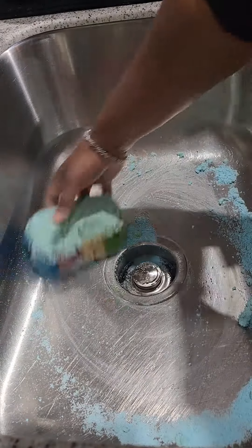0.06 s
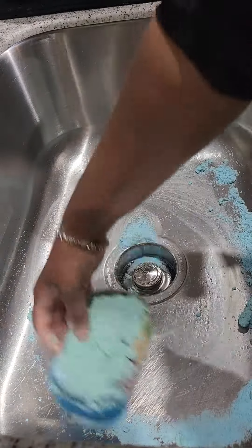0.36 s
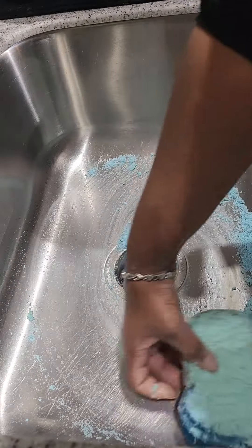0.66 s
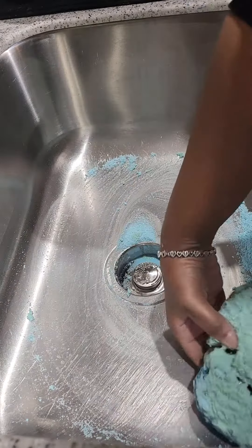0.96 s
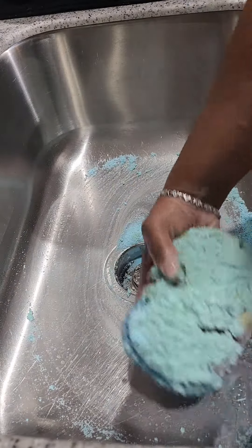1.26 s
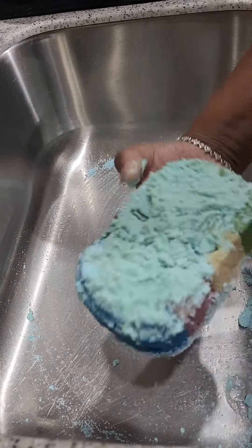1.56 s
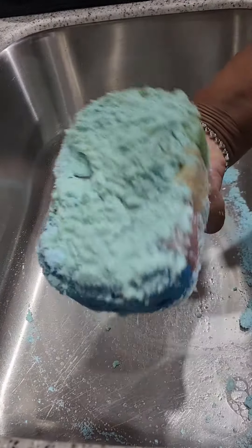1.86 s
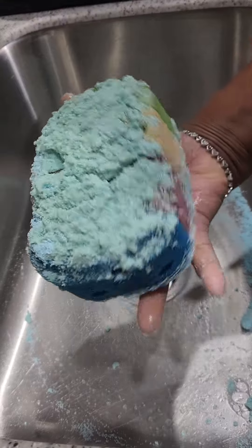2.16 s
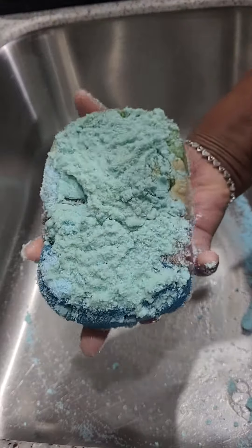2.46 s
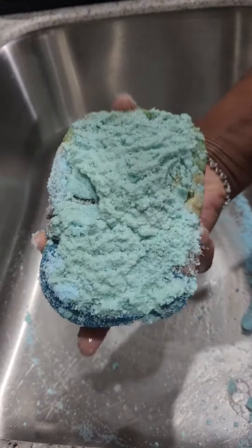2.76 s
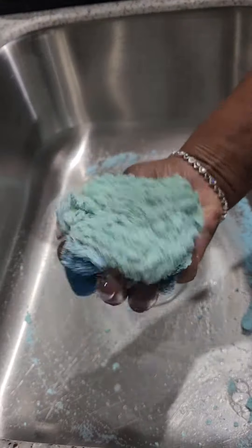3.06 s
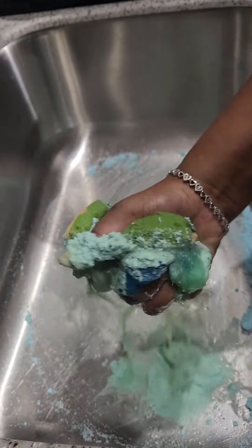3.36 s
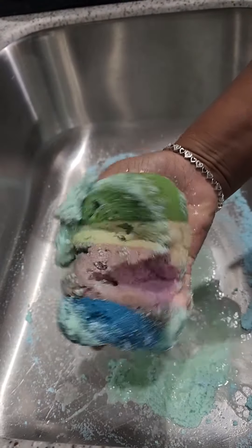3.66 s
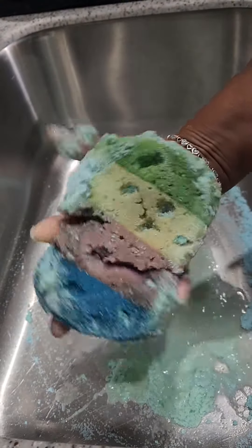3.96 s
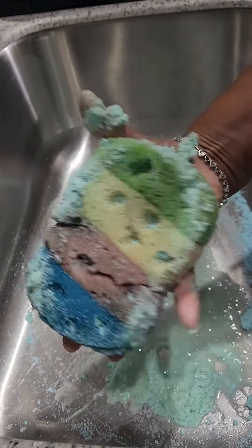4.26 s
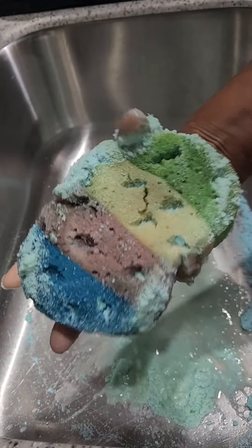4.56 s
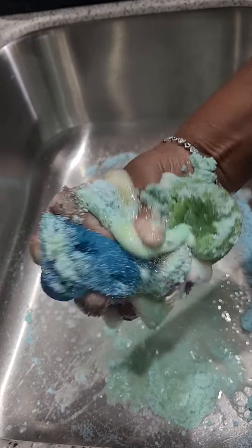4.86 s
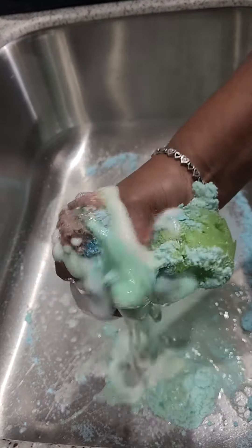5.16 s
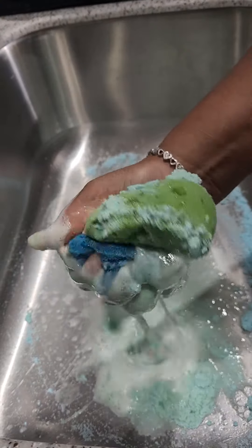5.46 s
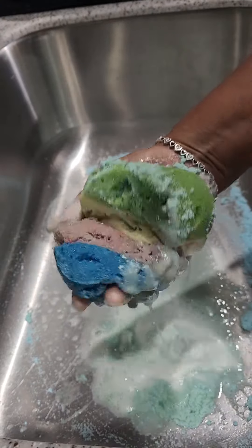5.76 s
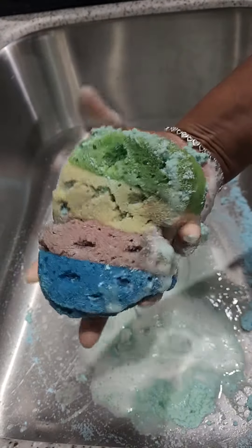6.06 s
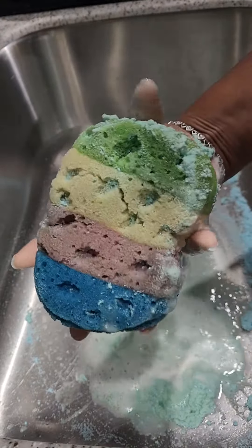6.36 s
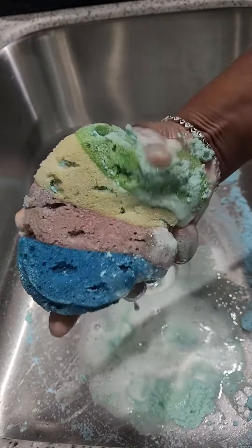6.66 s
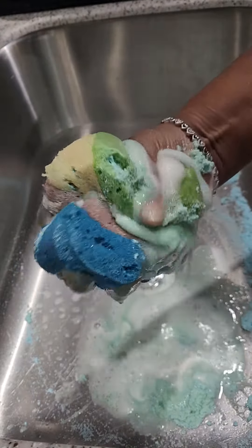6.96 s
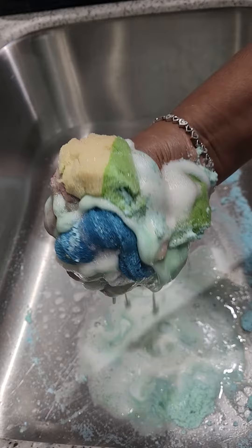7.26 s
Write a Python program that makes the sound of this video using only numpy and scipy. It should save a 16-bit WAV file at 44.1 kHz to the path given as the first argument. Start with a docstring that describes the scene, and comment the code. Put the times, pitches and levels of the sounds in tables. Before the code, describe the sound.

A sponge caked with cleanser scrapes round a stainless steel sink with a gritty hiss and low drumming. After a quieter stretch and one sharp tap, it is squeezed three times. Foam fizzes and crackles, lumps of paste splat on the basin, bubbles pop and air gurgles out. A couple of softer taps come with the last squeeze. The sound is close, in a kitchen with faint hum and hiss.

```python
"""Soapy sponge in a steel sink

A sponge caked with cleanser paste is wiped round the sink, lifted and squeezed three times.
Foam fizzes and crackles in its pores, paste and suds drop on the drumming basin, air gurgles out.
A few hard taps sound nearby; mains hum, room rumble and microphone hiss lie underneath."""
import sys
import numpy as np
from scipy import signal
from scipy.fft import rfft, irfft
from scipy.io import wavfile

SR = 44100
rng = np.random.default_rng(int(sys.argv[2]) if len(sys.argv) > 2 else 0)


def wav_out(sig):
    """Save sig, one row per channel (or a flat mono array), as 16-bit PCM at SR to the path in sys.argv[1]."""
    wavfile.write(sys.argv[1], SR, np.round(np.clip(np.atleast_2d(sig).T, -1, 1) * 32767).astype(np.int16))


N = 326340
TIME = np.arange(N) / SR
TOP_HZ = 15900


def undb(db):
    """Decibels to gain."""
    return 10 ** (np.asarray(db) / 20)


def colour(x, spectrum, size=8192):
    """Minimum-phase filter of unit power gain through (Hz, dB) points."""
    hz, db = np.transpose(spectrum)
    bins_hz = np.arange(size // 2 + 1) * SR / size
    gain = undb(np.interp(np.log(bins_hz + 1), np.log(hz), db))
    cepstrum = irfft(np.log(gain / np.sqrt(np.mean(gain ** 2))))
    cepstrum[1:size // 2] *= 2
    cepstrum[size // 2 + 1:] = 0
    impulse = irfft(np.exp(rfft(cepstrum)))
    return signal.fftconvolve(np.atleast_2d(x), impulse[None], axes=1)[:, :x.shape[-1]]


def tilted(rows, db_per_octave):
    """Tilt a spectrum or a set of modes above 1500 Hz."""
    return [(hz, db + db_per_octave * np.log2(max(hz / 1500, 1)), *rest) for hz, db, *rest in rows]


def butter(x, order, hz, kind):
    """Butterworth filter."""
    return signal.sosfilt(signal.butter(order, hz, kind, fs=SR, output="sos"), x)


def unit(x, band):
    """Scale the mono mix to rms 1 in a named band."""
    edges_hz = {"bass": (40, 200), "body": (250, 650), "gulp": (600, 1300),
                "wet": (1200, 2800), "fine": (4000, 14000)}[band]
    return x / butter(np.atleast_2d(x).mean(0), 3, edges_hz, "band").std()


def pan(x, left_db):
    """Stereo with the left channel left_db above the right."""
    return x * undb(np.array([[left_db], [-left_db]]) / 2)


def wander(rate_hz):
    """Smooth random curve with a spread near 1."""
    return 1.2 * np.interp(TIME * rate_hz, np.arange(4000), rng.standard_normal(4000))


def add(track, start_s, sound):
    """Mix a short sound into a track."""
    start = min(max(int(start_s * SR), 0), N)
    part = sound[..., :N - start]
    track[..., start:start + part.shape[-1]] += part


def envelopes(moves, swell_db=21.5):
    """One gain curve per level column: each move rises, holds and falls; overlaps add in power."""
    t = TIME[::64]
    power = 0
    for start_s, rise_s, hold_s, fall_s, *levels_db in moves:
        rising = np.maximum(1 - (t - start_s) / rise_s, 0)
        falling = np.maximum(t - start_s - rise_s - hold_s, 0) / fall_s
        drop_db = swell_db * np.minimum(rising ** 2 + falling ** 2, 10)
        power = power + undb(np.subtract.outer(levels_db, swell_db * np.minimum(rising ** 2 + falling, 10))) ** 2
    return np.array([np.interp(TIME, t, gain) for gain in np.sqrt(power)])


def ring(modes, lag_turns=0):
    """Struck modes dying away; a phase lag from each to the next makes the ring swell in."""
    t = TIME[:SR // 2]
    return sum(undb(db - 60 * t / t60_s) * np.sin(2 * np.pi * (hz * t - lag_turns * k))
               for k, (hz, db, t60_s) in enumerate(modes))


def burst(t60_s):
    """A dying puff of stereo noise."""
    return rng.standard_normal((2, SR // 4)) * undb(-60 * TIME[:SR // 4] / t60_s)


def clicks(per_s, spread_db):
    """Random impulses, each with its own lag between the channels."""
    when, side, strength = rng.random((int(per_s * N / SR), 3)).T
    at = (when * (N - 40)).astype(int) + 20
    lag = (side * 24 - 14).astype(int)
    size = undb(spread_db * np.minimum(-np.log(strength), 4.5)) * (-1) ** np.arange(len(at))
    return np.array([np.bincount(at, size, N), np.bincount(at + lag, size, N)])


def bubble(hz, cycles, glide):
    """An air bubble rings and rises in pitch as it reaches the surface."""
    age = TIME[:int(SR * cycles / hz) + 2] * hz / cycles
    return undb(-50 * age) * np.sin(2 * np.pi * cycles * (age + glide * age ** 2 / 2))


def bubbles(per_s, centre_hz, octaves, spread_db, cycles, glide):
    """A steady swarm of bubbles of scattered size, pitch and place."""
    out = np.zeros((2, N))
    count = int(per_s * N / SR)
    starts_s = rng.random(count) * N / SR
    for start_s, (pitch, size, side) in zip(starts_s, rng.standard_normal((count, 3))):
        hz = np.clip(centre_hz * 2 ** (octaves * pitch), 250, TOP_HZ)
        sound = undb(spread_db * min(size, 2)) * bubble(hz, cycles, glide)
        add(out[0], start_s, undb(1.5 * side) * sound)
        add(out[1], start_s + 0.00018 * side, undb(-1.5 * side) * sound)
    return out


# Room rumble and microphone hiss spectra. Each row: frequency in Hz, density in dB.
RUMBLE_SPECTRUM = [(20, -9.5), (40, 2.5), (58, 9), (80, 6), (105, -1.5), (145, 5.5), (190, -10.5),
                   (245, -28), (305, -13.5), (370, -26), (520, -44), (720, -24.5), (1100, -32), (4000, -55)]
HISS_SPECTRUM = [(300, -7), (1400, -14), (2000, 3.5), (2650, 2), (3300, -8), (3900, -9), (4700, -4.5),
                 (5700, -2.5), (6700, -13), (7700, -4.5), (9200, -20.5), (13000, -18.5), (16000, -21)]

def background(hum_hz=60, hum_db=-60.5, rumble_db=-62.5, hiss_db=-72, drop_s=3.3, drop_db=-3):
    """Mains hum, room rumble and microphone hiss, mostly left, that sinks a little midway."""
    hum = np.sqrt(2) * np.sin(2 * np.pi * hum_hz * TIME + 0.051 * wander(26))
    hum *= undb(hum_db + 0.61 * wander(22))
    noise = rng.standard_normal(N) + 0.3 * rng.standard_normal((2, N))
    rumble = undb(rumble_db) * unit(colour(noise, RUMBLE_SPECTRUM), "bass")
    hiss = unit(pan(colour(rng.standard_normal((2, N)), HISS_SPECTRUM), 18.8), "fine")
    hiss *= undb(hiss_db + drop_db * np.clip(TIME - drop_s + 0.5, 0, 1))
    return pan(hum + rumble, 1.3) + hiss


def kitchen_echo(x):
    """Short reflections off the kitchen walls."""
    walls = burst(t60_s=0.12)
    return signal.fftconvolve(x, walls / np.linalg.norm(walls[0]), axes=1)[:, :N]


# Air and wall resonances of the sink. Each row: frequency in Hz, level in dB, T60 in seconds.
HOLLOW_MODES = [(418.8, 12.5, 0.13), (706, -3.5, 0.15), (745, -4, 0.15), (816, -2.5, 0.15),
                (860, -15, 0.11), (972, 4.5, 0.081), (1500, -15, 0.1), (1624, -8.5, 0.18),
                (2130, -16, 0.18)]

def sink_hollow(x):
    """The hollow of the sink rings along with sounds made in it."""
    return signal.fftconvolve(x.mean(0), ring(HOLLOW_MODES))[:N]


# Steel floor modes. Each row: frequency in Hz, level in dB, T60 in seconds.
BASIN_MODES = [(75.5, -1, 0.15), (128.3, -12.5, 1), (145, -11.5, 0.58), (190, -8, 0.14),
               (232.3, -15.5, 0.28), (270.7, -10, 0.32), (297.8, 1, 0.26), (318.8, -1, 0.17),
               (375.6, -8, 0.23), (427.5, -9, 0.26), (457.7, -8, .25), (485.7, -9, 0.26),
               (504.2, -10, 0.24), (539, -10.5, 0.14), (600, -23, 0.14), (715, -21, 0.22), (766, -21, 0.16),
               (920, -19, 0.14)]

def basin(force):
    """The steel floor answers a force with its low modes and radiates little below them."""
    return butter(signal.fftconvolve(force, ring(BASIN_MODES, lag_turns=0.4316))[:N], 2, 60, "high")


# Hard taps. Each row: start in seconds, level in dB, tilt in dB per octave.
TAP_HITS = [(2.134, -22, 0.3), (6.4784, -47, -6), (6.5795, -36.5, -10)]
# Their crack. Each row: frequency in Hz, density in dB.
CRACK_SPECTRUM = [(200, -25), (720, -23), (980, -5), (1950, 1), (2650, -10), (4000, -22), (4800, -9),
                  (6300, -16), (8000, -23), (10000, -28), (15000, -37)]
# Their ring. Each row: frequency in Hz, level in dB, T60 in seconds.
TAP_MODES = [(1027, -8, 0.061), (1250, -27, 0.06), (1433, 4, 0.087), (1840, -8, .07), (1990, 0, 0.08),
             (3050, -5, 0.045), (4650, -9, 0.086), (4960, -5, 0.047), (5330, -8, 0.13), (5750, -11, .08),
             (7140, -11, 0.14)]

def taps(crack_db=17.5, ring_db=-19, scatter_db=-6.5, left_lag_s=0.00015):
    """Hard contacts: a sharp crack, a short ring and scatter from the sink walls."""
    out = np.zeros((2, N))
    for start_s, db, tilt in TAP_HITS:
        contact = undb(scatter_db) * burst(t60_s=0.032)
        contact[:, 0] += undb(crack_db)
        tap = colour(contact, tilted(CRACK_SPECTRUM, tilt))
        tap += undb(ring_db) * ring(tilted(TAP_MODES, tilt), lag_turns=0.297)[:SR // 4]
        add(out[0], start_s + left_lag_s, undb(db) * tap[0])
        add(out[1], start_s, undb(db) * tap[1])
    return pan(out, 4)


# Sponge shifting in the hand. Each row: start, rise, hold, fall in seconds, level in dB, pitch in Hz.
SQUEAK_MOVES = [(1.202, 0.11, 0.036, 0.15, -79, 687), (1.716, 0.063, 0.29, 0.24, -87.5, 667),
                (2.714, 0.054, 0.26, 0.34, -75, 790)]

def squeaks(skirt_ratio=1.32, skirt_db=-22):
    """Wet foam slips against the skin in tiny jerks that ring one narrow band."""
    out = np.zeros((1, N))
    for *move, hz in SQUEAK_MOVES:
        band = [(hz / 2, -60), (hz / skirt_ratio, skirt_db), (hz, 0),
                (hz * skirt_ratio, skirt_db), (hz * 2, -60)]
        slips = colour(clicks(per_s=900, spread_db=1.5)[0], band)
        out += slips / slips.std() * envelopes([move])
    return pan(out, 8.9)


# Falling lumps. Each row: start in seconds, thud in dB, splat in dB, splat tilt in dB per octave.
LUMPS = [(0.061, -45.5, -62, -13), (0.271, -57, -62, -19), (.552, -52, -58, -11), (.925, -63, -54.5, -14),
         (1.426, -59.5, -70, -10), (1.72, -64.5, -78, -4), (2.137, -52.5, -72, -10),
         (2.337, -60.5, -58, -3.5), (2.613, -62, -59, 5), (3.242, -70, -46, -3.5), (3.380, -36, -33, 2),
         (3.392, -41.5, -30.5, 0.5), (3.41, -36, -34.5, 6), (3.4416, -35, -30, -2.5), (3.447, -30, -38, -1),
         (3.461, -32, -33, 2), (3.479, -43, -32.5, -3), (3.505, -45, -33, -0.5), (3.689, -48, -54, 5),
         (4.045, -42, -41, 3.5), (4.23, -42, -45, 1.5), (4.328, -54.5, -55, -0.5), (4.886, -52, -47, -18),
         (5.162, -47, -48, 5), (5.352, -49, -45, 2), (5.419, -59.5, -50, -2), (5.681, -58, -54, -8),
         (6.02, -62, -51, -8.5), (6.315, -53.5, -64, -4), (6.581, -53.5, -47, -3)]
# Wet splat. Each row: frequency in Hz, density in dB.
SPLAT_SPECTRUM = [(200, -21), (700, 8.5), (1200, 3.5), (1900, 4), (2700, 3), (3400, 8.5), (7500, 9),
                  (9000, 3), (11000, 3.5), (14500, 1), (16000, 6)]

def plops(push_s=0.00084, slump_db=-26):
    """Soft lumps splat, push the steel and slump on it."""
    force, splats = np.zeros(N), np.zeros((2, N))
    push = np.exp(-TIME[:SR // 4] / push_s) / (push_s * SR)
    for start_s, thud_db, splat_db, tilt in LUMPS:
        slump = undb(slump_db) * burst(t60_s=0.12)[0] / np.sqrt(push_s * SR)
        splat = colour(burst(t60_s=0.063), tilted(SPLAT_SPECTRUM, tilt))
        add(force, start_s, undb(thud_db) * (push + slump))
        add(splats, start_s, undb(splat_db) * splat)
    return pan(basin(force), 1.8) + pan(splats, 4.2)


def air_pocket(start_s=6.712, hz=181, swell_s=0.022, tone_db=-33, splutter_db=-44, splutter_s=0.03):
    """Air blurts through the paste: a low note with a wet splutter on each flap."""
    out, t = np.zeros((2, N)), TIME[:SR // 3]
    flap = np.sin(2 * np.pi * np.cumsum(hz * (1 + 0.024 * wander(48)[:len(t)])) / SR)
    swell = (t / swell_s * np.exp(1 - t / swell_s)) ** 0.99
    spray = colour(rng.standard_normal((2, len(t))) * (1 + 0.23 * flap),
                   [(600, -0.5), (850, 2.5), (1100, -5), (1500, 3),
                    (2500, -4.5), (3500, -24), (9000, -39)])
    throat = colour(rng.standard_normal(len(t)),
                    [(130, -28), (200, 4.5), (290, 7.5), (400, -13), (560, 3.5), (750, -22), (2000, -49)])
    splutter = (throat + spray) * t / splutter_s * np.exp(1 - t / splutter_s)
    add(out, start_s, undb(tone_db) * swell * flap + undb(splutter_db) * splutter)
    return pan(out, 1.7)


# Escaping air. Each row: start, rise, hold, fall in seconds, level in dB.
AIR_ESCAPES = [(4.62, 0.24, .15, .2, -56.5), (4.99, 0.049, 0.041, 0.14, -39.5),
               (5.45, 0.12, 0.54, 0.37, -68), (6.29, 0.047, 0.015, 0.15, -59),
               (6.46, 0.02, .03, 0.13, -54.5)]

def gurgle():
    """Air forced between the fingers makes a cluster of mid-sized bubbles, damped by the suds."""
    swarm = bubbles(per_s=600, centre_hz=1000, octaves=0.42, spread_db=2.5, cycles=14, glide=0.08)
    swarm = unit(butter(swarm, 2, 640, "high"), "gulp")
    return pan(swarm * envelopes(AIR_ESCAPES) * undb(-6.5), 4.9)


# One light pass over the steel with harder pushes on top.
# Each row: start, rise, hold, fall in seconds, then hiss, scrape, drumming in dB.
WIPE_STROKES = [(0.0, 0.0033, 1.046, 0.057, -63, -76.5, -73), (0.0, 0.088, 0.035, 0.24, -52.5, -69, -83),
                (0.435, 0.074, 0.048, 0.33, -54, -77, -73), (0.485, 0.063, 0.047, 0.12, -71, -68, -51),
                (0.61, 0.04, 0.019, 0.28, -62, -68, -53), (0.88, 0.048, 0.02, 0.063, -82, -64, -59),
                (0.975, 0.042, 0.023, 0.06, -62.5, -65.5, -89)]
# Grit hiss, scrape and drag force spectra. Each row: frequency in Hz, density in dB.
GRIT_SPECTRUM = [(600, -26), (1300, -24), (2200, -18), (3200, -9.5), (5300, -3.5), (6500, -3), (7500, -1),
                 (8800, -5.5), (10300, -4), (11200, -10.5), (13000, -6.5), (16000, -12.5)]
SCRAPE_SPECTRUM = [(400, -11), (900, 4), (1900, 3), (3000, -12), (8000, -45)]
DRAG_SPECTRUM = [(80, -27), (150, -11.5), (280, -11.5), (400, -8.5), (520, 5), (650, 7), (1000, -15)]

def wipe(grain_db=0.7, judder_db=4.5):
    """Grit hisses and scrapes under the sponge; its dragging makes the steel groan."""
    hiss_gain, scrape_gain, drum_gain = envelopes(WIPE_STROKES)
    hiss = unit(colour(clicks(per_s=14000, spread_db=1), GRIT_SPECTRUM), "fine")
    hiss *= undb(grain_db * wander(45.5))
    scrape = unit(colour(clicks(per_s=3000, spread_db=1), SCRAPE_SPECTRUM), "gulp") * undb(-4.5)
    drag = colour(rng.standard_normal(N), DRAG_SPECTRUM)[0] * undb(judder_db * wander(30.05))
    drum = unit(basin(drag), "body") * undb(0.5)
    return pan(hiss * hiss_gain, 2.4) + pan(scrape * scrape_gain + drum * drum_gain, 6.4)


def runoff(gain):
    """Suds patter from the fist on to the basin; light drops stir mostly its upper modes."""
    drops = butter(clicks(per_s=300, spread_db=3.5)[0], 1, 220, "high")
    return pan(unit(basin(drops), "body") * gain * undb(-5.5), 5.4)


# Snapping soap films. Each row: frequency in Hz, density in dB.
FIZZ_SPECTRUM = [(1200, -7.5), (2600, -1.5), (3500, -2), (4200, -2.5), (5500, 2.5), (6600, -0.5), (7400, 1),
                 (8600, -4), (10300, -5.5), (11200, -16), (14000, -11), (16000, -25)]

def spits(gain, tick_db=-16, ping_db=-13):
    """Bigger cells burst out of the foam with a tick or a brief ping."""
    ticks = signal.fftconvolve(clicks(per_s=45, spread_db=5), burst(t60_s=0.021), axes=1)[:, :N]
    ticks = unit(colour(ticks, FIZZ_SPECTRUM), "fine")
    pings = bubbles(per_s=90, centre_hz=3000, octaves=0.7, spread_db=3, cycles=50, glide=0.04)
    return pan((undb(tick_db) * ticks + undb(ping_db) * pings / pings.std()) * gain, 1.2)


# Single bursts. Each row: start in seconds, pitch in Hz, ring in dB, snap in dB.
LARGE_BUBBLES = [(3.27, 3020, -54, -39), (3.665, 1870, -39, -66), (4.208, 5000, -56, -51),
                 (5.037, 960, -48.5, -56), (5.118, 823, -55, -56.5), (5.149, 960, -42, -53),
                 (5.317, 2100, -54, -42.5), (5.354, 1955, -43, -47), (5.478, 1600, -43.5, -60),
                 (5.531, 1520, -51, -43.5), (5.765, 2020, -61, -53), (6.1236, 2400, -54, -56),
                 (6.424, 1730, -53.5, -54)]

def pops():
    """A large bubble snaps open and its cavity rings."""
    rings, snaps = np.zeros(N), np.zeros((2, N))
    for start_s, hz, ring_db, snap_db in LARGE_BUBBLES:
        add(rings, start_s, undb(ring_db) * bubble(hz, cycles=35, glide=0.045))
        add(snaps, start_s, undb(snap_db) * burst(t60_s=0.023))
    return pan(rings, 6.9) + pan(colour(snaps, FIZZ_SPECTRUM), 1.5)


# Wet crackle. Each row: frequency in Hz, density in dB.
CRACKLE_SPECTRUM = [(300, -5.5), (600, -10), (1000, -8), (1500, 3), (2050, 4.5), (2700, -2.5), (4000, -4.5),
                    (9000, -21)]

def foam(fizz_gain, crackle_gain, dense_db=-52, surge_db=1.12, spurt_db=2):
    """Under pressure countless small cells burst; as the sponge relaxes, fewer do, in clumps."""
    pressure = fizz_gain ** 2 / (fizz_gain ** 2 + undb(dense_db) ** 2)
    many = unit(colour(clicks(per_s=11000, spread_db=0), FIZZ_SPECTRUM), "fine")
    few = unit(colour(clicks(per_s=1800, spread_db=2), FIZZ_SPECTRUM), "fine")
    pings = bubbles(per_s=700, centre_hz=6300, octaves=0.4, spread_db=3.5, cycles=45, glide=0.04)
    plips = bubbles(per_s=500, centre_hz=1650, octaves=0.4, spread_db=2.5, cycles=18, glide=0.06)
    snaps = colour(clicks(per_s=2200, spread_db=1), CRACKLE_SPECTRUM)
    fizz = np.sqrt(pressure) * many + np.sqrt(1 - pressure) * few + undb(-9.5) * unit(pings, "fine")
    crackle = undb(-5) * unit(snaps, "wet") + undb(-9) * unit(plips, "wet")
    clumps = undb((1.5 - pressure) * wander(45))
    fizz *= fizz_gain * undb(surge_db * wander(60) - 4.5)
    crackle *= crackle_gain * undb(spurt_db * wander(40))
    return clumps * (pan(fizz, 0.89) + pan(crackle, 5))


# Fingers closing on the sponge or letting it swell.
# Each row: start, rise, hold, fall in seconds, then fizz, crackle, runoff in dB.
HAND_GRIPS = [(1.1, 0.095, 0.32, .06, -76, -86, -91), (2.24, 0.17, .015, 0.035, -68.5, -85, -89),
              (2.85, 0.17, 0.035, 0.1, -59, -66.5, -88), (3.17, 0.074, 0.017, .2, -52.5, -59, -66.5),
              (3.335, 0.082, 0.11, 0.31, -43, -63.5, -45), (3.54, 0.049, 0.051, 0.12, -48.5, -52.5, -63),
              (3.65, 0.059, 0.093, 0.084, -55.5, -59, -54), (3.8, 0.038, 0.09, 0.15, -57.5, -63, -54),
              (4.16, 0.021, 0.021, .25, -60, -66.5, -54), (4.49, 0.049, 0.02, 0.041, -61.5, -78, -81),
              (4.565, 0.22, 0.13, .35, -46.5, -51.5, -67), (4.79, 0.21, 0.033, 0.083, -44, -48, -50),
              (5.03, 0.075, 0.581, .1, -58, -59, -60), (5.73, 0.038, .01, 0.061, -54.5, -57.5, -66.5),
              (5.8, 0.079, 0.016, 0.24, -55, -57, -66), (6.48, 0.084, 0.099, 0.61, -53.5, -57, -67),
              (6.62, 0.35, 0.046, 1.43, -48.5, -52.5, -61)]

def scene():
    """The grips drive foam and runoff; sink and kitchen ring along with the sponge."""
    fizz_gain, crackle_gain, runoff_gain = envelopes(HAND_GRIPS)
    suds = wipe() + foam(fizz_gain, crackle_gain) + spits(crackle_gain) + gurgle()
    patter = runoff(runoff_gain)
    hollow = undb(-52.5) * sink_hollow(suds + undb(-13.5) * patter)
    sink = suds + hollow + patter + plops() + pops() + air_pocket() + squeaks()
    tap = taps()
    echo = kitchen_echo(sink + undb(-4.5) * tap)  # the taps are close, so they carry less room
    return sink + tap + undb(-9.5) * echo + background()


def record(dry):
    """The phone cuts the top treble."""
    return signal.sosfilt(signal.ellip(10, 0.2, 70, TOP_HZ, fs=SR, output="sos"), dry)


dry = scene()
out = record(dry)
wav_out(out)
```